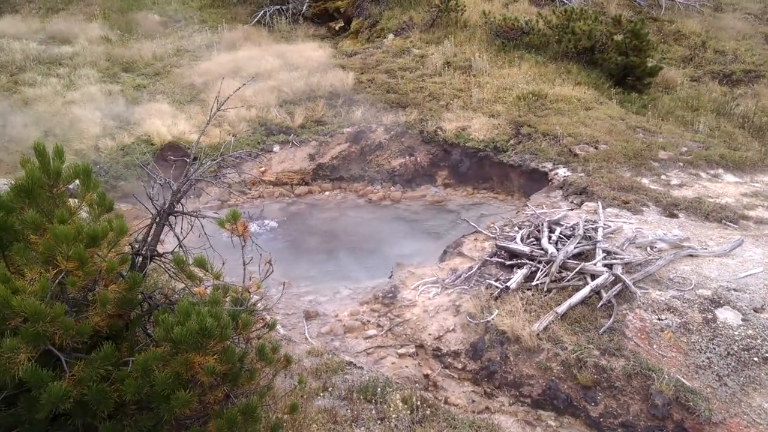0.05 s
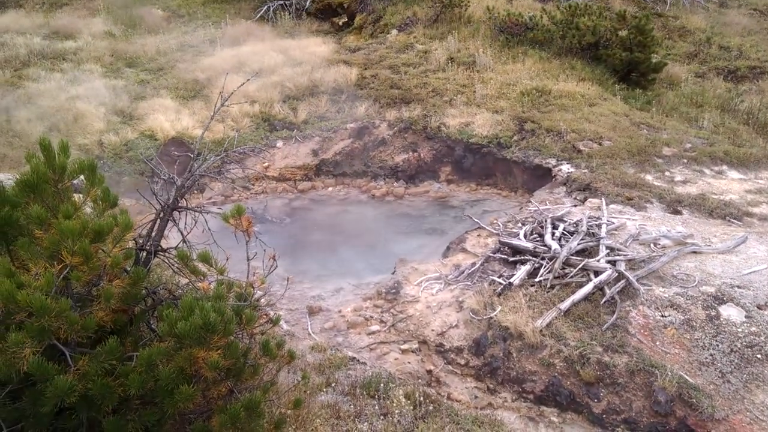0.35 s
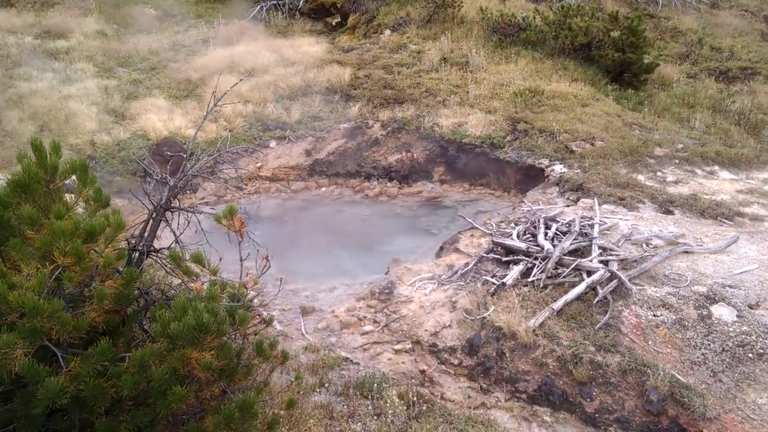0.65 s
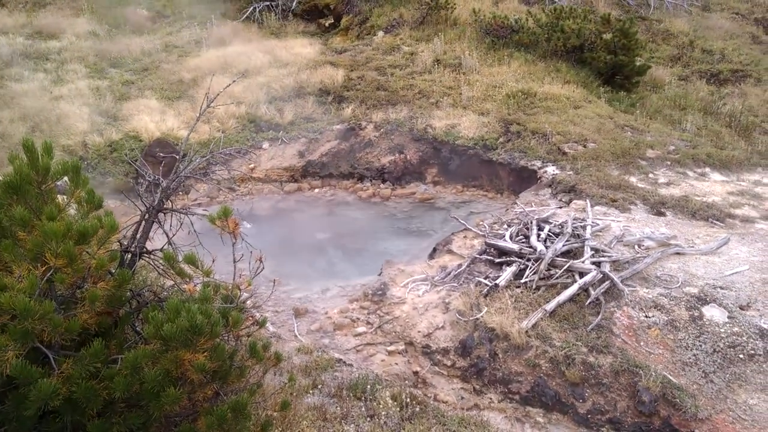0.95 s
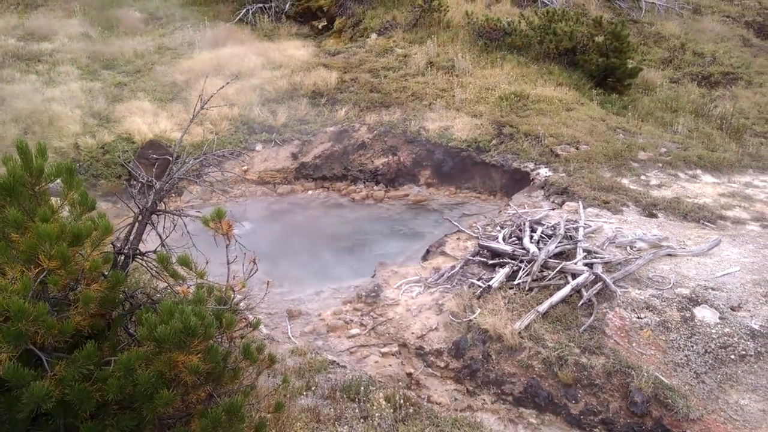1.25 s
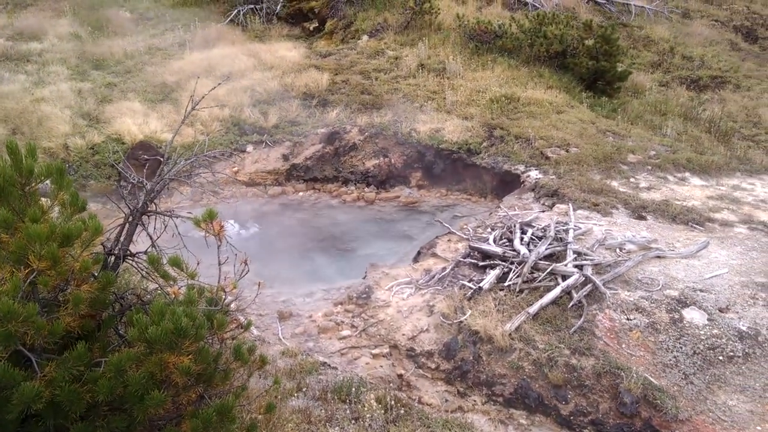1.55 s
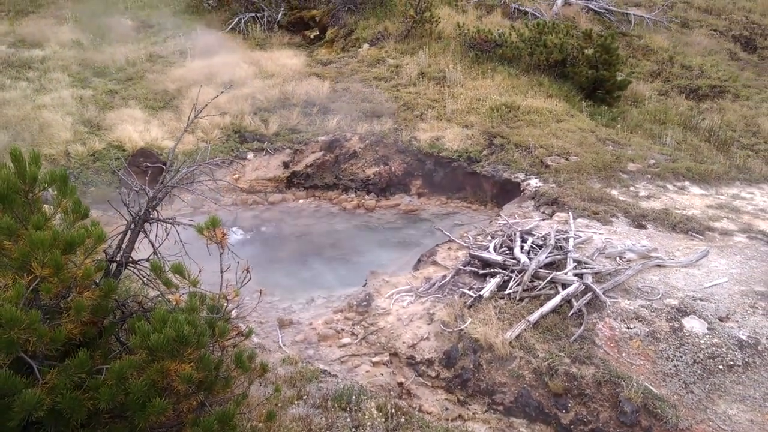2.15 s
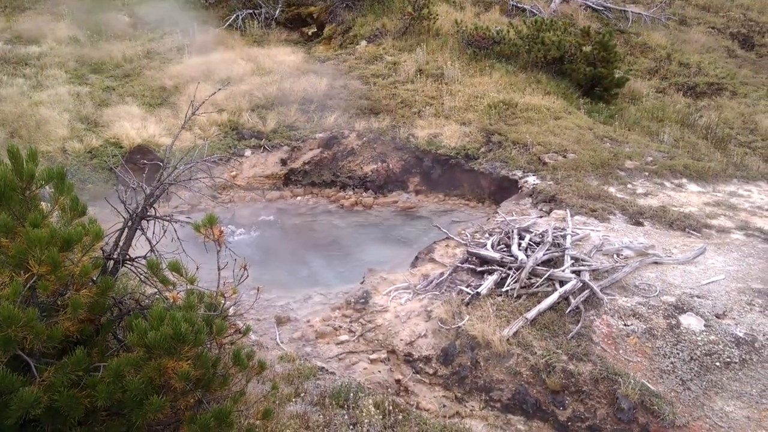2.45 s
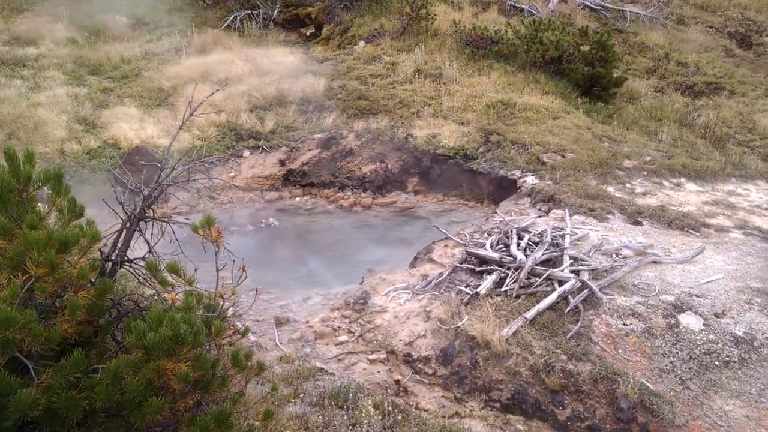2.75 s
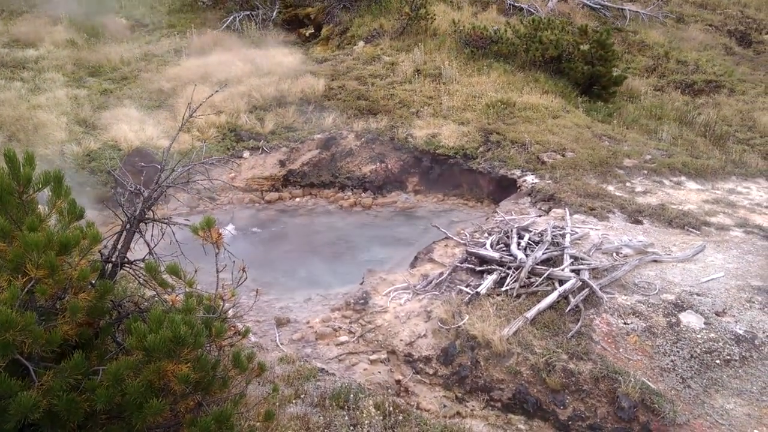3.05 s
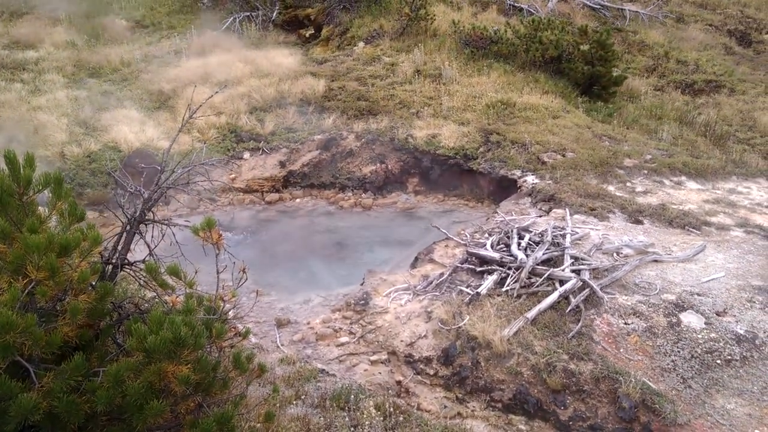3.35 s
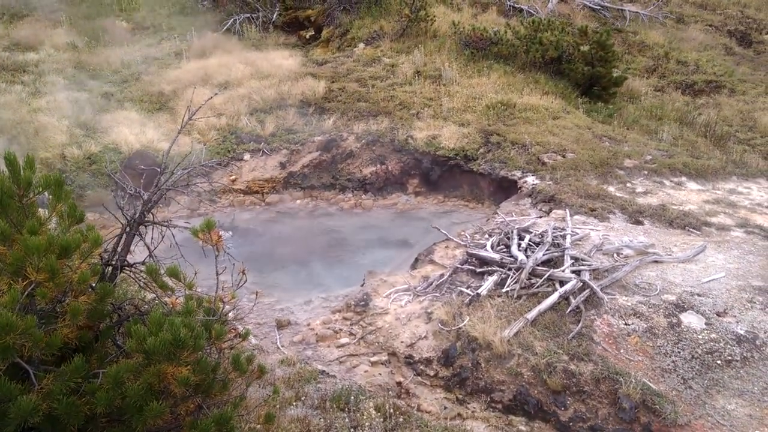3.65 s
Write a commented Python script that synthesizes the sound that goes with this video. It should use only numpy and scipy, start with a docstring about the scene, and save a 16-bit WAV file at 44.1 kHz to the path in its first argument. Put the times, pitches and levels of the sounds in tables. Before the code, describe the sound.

A hot spring bubbles and fizzes throughout over a steady low rush of steam, slightly to the right. Short splashy surges and plops come near 0.2 and 0.8 seconds, strongest from 1.5 to 1.8, then around 2.5 and 3.6, with tiny sharp ticks between. A faint, high insect chirps about three times a second. Wind buffets the microphone mostly in the first 1.5 seconds, then fades.

```python
"""At a hot spring in open ground, steam and water rush steadily, a little to the right.
Countless tiny bubbles burst into a fine fizz dotted with faint high pings; nearer ones tick sharply.
The pool ahead simmers, boils up in short splashy surges and plops: each bubble rings briefly.
Insects chirp in the grass with quick wing strokes, and wind buffets the microphone, mostly at first."""
import sys
import numpy as np
from scipy.fft import rfft, irfft
from scipy.io import wavfile

SR = 44100
rng = np.random.default_rng(int(sys.argv[2]) if len(sys.argv) > 2 else 0)


def waveform_to_disk(signal):
    """Save audio, clipped to [-1, 1], as 16-bit WAV at the path in sys.argv[1]."""
    frames = np.transpose(np.atleast_2d(signal))
    scaled = np.clip(frames, -1, 1) * 32767
    samples = np.round(scaled).astype(np.int16)
    wavfile.write(sys.argv[1], SR, samples)


N = 176400
T = np.arange(N) / SR
HZ = np.maximum(np.arange(N // 2 + 1) * SR / N, 1)

# Tone of the rush: pitch_hz, left_db, right_db
RUSH_TONE = [(30, -69, -68), (100, -70, -64), (166, -70.5, -65), (206, -66, -62.5), (318, -69.5, -62.5),
             (402, -73.5, -67), (465, -73.5, -70), (552, -73.5, -64.5), (783, -78.5, -70),
             (918, -72.5, -69), (1117, -79.5, -77.5), (1620, -77.5, -78.5), (1980, -79.5, -74),
             (2380, -87.5, -86), (2620, -111, -121), (6000, -115, -115)]
# How the rush reaches the two sides: pitch_hz, likeness, left_lead_radians
RUSH_SIDES = [(81, 0.15, 0), (203, 0.88, -0.47), (320, 0.89, -1.2), (407, 0.4, -2), (487, 0.093, 0.66),
              (560, 0.97, 0.2), (825, 0.75, 0.5), (1400, 0.83, 0), (1640, 0.033, 1.5), (1900, 0.086, 0.84),
              (2220, 0.89, 3.0)]

def rush(waver_db=0.64):
    """Steam and water make a dull, even noise that wavers slightly."""
    left_db, right_db = over_hz(RUSH_TONE)
    likeness, lead = over_hz(RUSH_SIDES)
    gains = np.array([from_db(left_db) * np.exp(1j * lead), from_db(right_db)])
    return irfft(pair(white(), white(), likeness) * gains, N) * from_db(waver_db * drift(6))


# Tone of the fizz: pitch_hz, right_db, left_minus_right_db, likeness
FIZZ_TONE = [(1490, -100, 0, 1), (2140, -78.5, -0.5, 0.57), (2660, -82, -1, 1), (3085, -82, 2.5, 0.55),
             (3290, -78.5, 2.5, 1), (4000, -83, -1.5, 0.93), (4600, -85.5, 2, 1), (5930, -83, -0.5, 0.72),
             (7570, -88.5, -4, 0.43), (8450, -82, -6.5, 0.51), (9980, -89, -11, .5), (12500, -90.5, -9, .3),
             (15500, -99, -9, 0.18)]

def fizz(bubble_share=0.42):
    """Countless tiny bubbles burst; the far ones merge into hiss."""
    db, left_db, likeness = over_hz(FIZZ_TONE)
    bubbles = swarm(per_s=1800, spread_db=2.5, cycles=3.7, low_hz=2860, high_hz=18400)
    mix = np.sqrt(bubble_share) * bubbles + np.sqrt(1 - bubble_share) * white()
    sides = pair(rfft(flicker(mix)), white(), likeness) * from_db(db)
    return from_right(sides, left_db) * from_db(0.9 * activity_db() + drift(22))


def pool(left_db=-2.5):
    """The pool ahead bubbles in three ways at once."""
    return (simmer() + surges() + plops()) * from_db([[left_db], [0]])


def simmer(level_db=-50.5, slosh_db=2.0):
    """Single bubbles keep ringing softly as the water sloshes."""
    bubbles = swarm(per_s=70, spread_db=2, cycles=20, low_hz=400, high_hz=2250)
    return water(bubbles) * from_db(level_db + activity_db() + slosh_db * drift(14))


# Moments when the pool boils up: middle_s, half_length_s, gurgle_db, splash_db
SURGES = [(0.114, 0.023, -44, -55), (0.237, 0.047, -44.5, -44), (0.84, 0.012, -39, -46),
          (1.635, 0.043, -47, -44.5), (1.727, 0.029, -40, -42), (2.406, 0.016, -50, -42.5),
          (2.49, 0.054, -41, -60), (2.602, 0.057, -46.5, -41), (3.592, 0.032, -42.5, -44.5),
          (3.906, 0.015, -42.5, -45.5)]

def surges(gurgle_top_hz=1000):
    """A crowd of bubbles swells up: the low ones gurgle and the high ones splash."""
    bubbles = swarm(per_s=700, spread_db=1.7, cycles=18.6, low_hz=400, high_hz=3580)
    low = 1 / (1 + (HZ / gurgle_top_hz) ** 6)
    gurgle = water(bubbles, low) * swells([(s, half, db) for s, half, db, _ in SURGES])
    splash = water(bubbles, 1 - low) * swells([(s, half, db) for s, half, _, db in SURGES])
    return gurgle + splash


# Tone of bubbling water: pitch_hz, level_db
WATER_TONE = [(200, -20), (450, 1), (700, 4.5), (1300, -1), (1800, -5.5), (2650, -18), (5000, -20.5),
              (12000, -31.5)]

def water(bubbles, band=1):
    """Give a swarm of bubbles the pool's tone and spread it over both sides."""
    sides = pair(bubbles, white(), likeness=0.69)
    return rms_one(irfft(sides * from_db(over_hz(WATER_TONE)[0]) * band, N))


# Big bubbles in the pool: start_s, pitch_hz, level_db, ring_cycles
PLOPS = [(.208, 1000, -29, 7.5), (.239, 580, -25, 15), (.505, 1900, -30.5, 30), (.836, 1000, -25, 7.6),
         (1.4905, 610, -18.5, 11.6), (1.6085, 1250, -20, 6.3), (1.715, 1310, -22, 9), (1.724, 1750, -22, 4),
         (1.738, 1050, -12, 4.3), (1.995, 810, -25, 3.6), (2.428, 2050, -27, 10), (2.434, 850, -23, 13),
         (2.51, 656, -25, 12), (2.55, 1800, -27.5, 23), (2.628, 690, -25, 13), (2.665, 1360, -27, 14),
         (3.439, 500, -24.5, 15), (3.591, 696, -27, 7.4)]

def plops():
    """Each big bubble rings with one short, rising note."""
    return ringing_bubbles(PLOPS)


# Small bubbles bursting nearby: start_s, pitch_hz, level_db, ring_cycles
TICKS = [(.3397, 4470, -27.5, 11), (.6445, 13500, -26, 14), (0.747, 6500, -21, 5),
         (1.3252, 4470, -21.5, 13), (1.4616, 5530, -24, 6.5), (1.585, 4600, -21, 6.1),
         (1.664, 5000, -27, 6.2), (1.8154, 4300, -26, 11), (1.95, 5530, -24.5, 6.5),
         (2.1014, 7000, -15.5, 2.7), (2.2381, 4000, -25.5, 8.4), (2.4117, 9000, -25, 2.8),
         (2.812, 11000, -29, 5), (2.875, 8000, -29, 5), (2.9632, 4220, -30, 10), (3.1627, 7800, -17.5, 4.5),
         (3.357, 11800, -29, 9.7)]

def ticks(spray_db=-15.5, spray_fade_s=0.013, echo_s=0.000711, echo_db=6):
    """Sharp little bursts, each with a trace of spray and an echo off the ground."""
    puffs = sum(from_db(db + spray_db - 60 * np.clip((T - s) / spray_fade_s, 0, 2)) * (T > s)
                for s, _, db, _ in TICKS)
    spray = rfft(puffs * rng.standard_normal(N))
    spray = spray / (1 - 3000j / HZ) ** 2 / (1 + 1j * HZ / 12000)  # mostly 3000 to 12000 Hz
    echo = from_db(echo_db) * np.exp(-2j * np.pi * HZ * echo_s)
    right = (rfft(ringing_bubbles(TICKS)) + spray) * (1 + echo)
    left = right / (1 + 1j * HZ / 6100)  # duller above 6100 Hz
    return from_right([left, right], left_db=-0.5)


def pings(count=160, low_hz=3270, high_hz=7500, loudest_db=-30.5, range_db=13.5, cycles=30):
    """Faint, short, high pings with rising pitch, scattered at random through the fizz, left and right."""
    when, pitch, smallness = rng.random((count, 3)).T
    pitch_hz = low_hz * (high_hz / low_hz) ** pitch
    level_db = loudest_db - range_db * smallness
    rows = [(s, hz, db, cycles) for s, hz, db in zip(when * N / SR, pitch_hz, level_db)]
    return np.array([ringing_bubbles(rows[::2]), ringing_bubbles(rows[1::2])]) * from_db(activity_db())


# How lively the spring is: time_s, level_db
ACTIVITY = [(0.0, -46), (0.29, -46.5), (0.55, -47.5), (0.9, -45), (1.04, -48), (1.16, -46), (1.42, -51.5),
            (1.59, -48.5), (1.78, -46.5), (2.1, -47), (2.8, -50.5), (3.48, -50), (3.85, -46), (3.97, -49.5)]

def activity_db():
    """How far the spring is above or below its usual strength."""
    level = over_time(ACTIVITY)
    return level - level.mean()


# Chirps of a near insect, then of a fainter, lower one: middle_s, pitch_hz, level_db
CHIRPS = [(0.061, 8350, -34), (.364, 8450, -34.5), (.696, 8440, -37.5), (1.002, 8370, -33),
          (1.296, 8440, -37), (1.605, 8330, -34.5), (1.908, 8430, -35), (2.226, 8470, -35),
          (2.541, 8430, -33.5), (2.872, 8400, -34.5), (3.19, 8400, -33.5), (3.479, 8420, -36),
          (3.789, 8360, -35), (0.434, 8100, -43), (.82, 8240, -40), (1.196, 8260, -40), (1.99, 8320, -38),
          (2.395, 8260, -43), (2.805, 8250, -38.5), (3.58, 8250, -38), (3.979, 8200, -40)]

def insects(rise_s=0.027, fall_s=0.022, strokes_per_s=111, rough_hz=30, glide_hz_per_s=1600):
    """Each chirp is a swelling and fading run of wing strokes on a slightly rough, rising pitch."""
    out = np.zeros(N)
    wobble = np.cumsum(drift(265)) * rough_hz / SR
    for (s, hz, db), offset in zip(CHIRPS, rng.random(len(CHIRPS))):
        span = abs(T - s) < .1
        t = T[span] - s
        shape = np.exp(-(t / np.where(t < 0, rise_s, fall_s)) ** 2)
        strokes = np.sin(np.pi * (strokes_per_s * t + offset)) ** 2
        tone = np.sin(2 * np.pi * (hz * t + glide_hz_per_s * t ** 2 / 2 + wobble[span]))
        out[span] += from_db(db) * shape * strokes * tone
    return from_right([rfft(out)] * 2, left_db=-9)


def far_insect(pitch_hz=9080, width_hz=310, first_s=0.13, every_s=.525, half_s=0.031, level_db=-55.5):
    """A distant, higher insect blurs into soft, regular pulses of hiss."""
    hiss = rms_one(irfft(white() / (1 + ((HZ - pitch_hz) / width_hz) ** 4), N))
    song = hiss * swells([(first_s + k * every_s, half_s, level_db) for k in range(8)])
    return from_right([rfft(song)] * 2, left_db=-9)


# Strength of the wind's rumble: time_s, level_db
RUMBLE_LEVEL = [(0, -21), (.16, -43), (.48, -43), (.58, -35), (.7, -39.5), (.9, -46), (1.1, -43),
                (1.3, -33.5), (1.87, -46), (2.35, -43), (3.1, -52), (4, -58)]
# Tone of the rumble: pitch_hz, level_db
RUMBLE_TONE = [(6, -10), (20, -1), (55, 1.5), (90, -17), (150, -14), (300, -34), (1000, -63), (4000, -96)]
# Swirls of air that strike the microphone: middle_s, half_length_s, level_db
SWIRLS = [(.02, 0.03, -25), (.1, 0.024, -25), (.25, 0.011, -33), (.56, 0.017, -19.5), (.605, 0.015, -24.5),
          (1.07, 0.03, -31)]
# Tone of the swirls: pitch_hz, level_db
SWIRL_TONE = [(6, -5), (25, 1), (70, -0.5), (115, -3), (170, -14), (300, -28), (1000, -57), (4000, -90)]

def wind(left_db=1.8):
    """Low rumble and sudden swirls of air push left and right in opposite directions."""
    def buffet(tone):
        sides = pair(white(), white(), likeness=-.93)
        return rms_one(irfft(sides * from_db(over_hz(tone)[0]), N))
    rumble = buffet(RUMBLE_TONE) * from_db(over_time(RUMBLE_LEVEL))
    swirls = buffet(SWIRL_TONE) * swells(SWIRLS)
    return (rumble + swirls) * from_db([[left_db / 2], [-left_db / 2]])


def ringing_bubbles(rows, onset_cycles=0.25, pitch_rise=0.081):
    """Each row is a pure tone that starts fast, climbs and fades by 60 dB over its ring cycles."""
    out = np.zeros(N)
    for s, hz, db, cycles in rows:
        span = slice(*np.searchsorted(T, [s, s + 2 * cycles / hz]))
        turns = hz * (T[span] - s)
        age = turns / cycles
        shape = (1 - np.exp(-turns / onset_cycles)) * np.exp(-np.log(1000) * age)
        out[span] += from_db(db) * shape * np.sin(2 * np.pi * turns * (1 + pitch_rise * age / 2))
    return out


def swarm(per_s, spread_db, cycles, low_hz, high_hz, pitches=20):
    """Random clicks ring as bubbles of many sizes; their spectrum is evened out to 0 dB per Hz."""
    born = rng.random(N) < per_s / SR
    sizes = from_db(spread_db * np.minimum(rng.exponential(1, N), 5))
    clicks = born * sizes * rng.choice([-1, 1], N)
    pitch_index = rng.integers(0, pitches, N)
    out, power = 0, 0
    for k, hz in enumerate(np.geomspace(low_hz, high_hz, pitches)):
        ring = 1 / (1 + 1j * np.pi * cycles / np.log(1000) * (HZ / hz - hz / HZ))
        out += rfft(clicks * (pitch_index == k)) * ring
        power += abs(ring) ** 2
    return rfft(rms_one(irfft(out / np.sqrt(power), N))) * np.sqrt(SR / 2)


def flicker(spectrum, depth_db=1.65, rate_hz=20, bands=9):
    """Each slice of the treble wavers by itself."""
    place = np.interp(np.log(HZ), np.log([1800, 14000]), [0, bands - 1])
    slices = (irfft(spectrum * np.maximum(1 - abs(place - k), 0), N) for k in range(bands))
    return sum(part * from_db(depth_db * drift(rate_hz)) for part in slices)


def from_right(spectra, left_db, lag_s=.00037):
    """Treble from the right reaches the left side late, upside down and changed by left_db."""
    left, right = spectra
    delay = np.exp(-2j * np.pi * HZ * lag_s)
    return irfft(np.array([-left * from_db(left_db) * delay, right]), N)


def pair(a, b, likeness):
    """Mix two signals into left and right: likeness 1 is alike, 0 unrelated, -1 opposite."""
    likeness = np.clip(likeness, -.99, .99)
    mid, side = np.sqrt((1 + likeness) / 2) * a, np.sqrt((1 - likeness) / 2) * b
    return np.array([mid + side, mid - side])


def swells(rows):
    """A volume curve made of bell-shaped bumps."""
    return np.sqrt(sum(from_db(db) ** 2 * np.exp(-((T - s) / half) ** 2) for s, half, db in rows))


def white():
    """Spectrum of white noise at 0 dB per Hz."""
    return rfft(rng.standard_normal(N)) * np.sqrt(SR / 2)


def drift(rate_hz):
    """A smooth random wander, about 1 in size."""
    return rms_one(irfft(white() / (1 + (HZ / rate_hz) ** 2), N))


def over_hz(rows):
    """Join each column of a table into a curve over pitch."""
    hz, *columns = np.transpose(rows)
    return [np.interp(np.log(HZ), np.log(hz), c) for c in columns]


def over_time(rows):
    """Join points in time with straight lines."""
    return np.interp(T, *np.transpose(rows))


def from_db(db):
    """Turn decibels into a volume factor."""
    return 10 ** (np.asarray(db) / 20)


def rms_one(x):
    """Scale to an average power of 1."""
    return x / np.sqrt(np.mean(x ** 2) + 1e-20)


def scene():
    """Everything together in the open air."""
    return rush() + fizz() + pings() + pool() + ticks() + insects() + far_insect() + wind()


def record(dry):
    """The highest treble is cut off steeply."""
    cutoff_hz = 15700
    return irfft(rfft(dry) / np.sqrt(1 + (HZ / cutoff_hz) ** 600), N)


dry = scene()
out = record(dry)
waveform_to_disk(out)
```